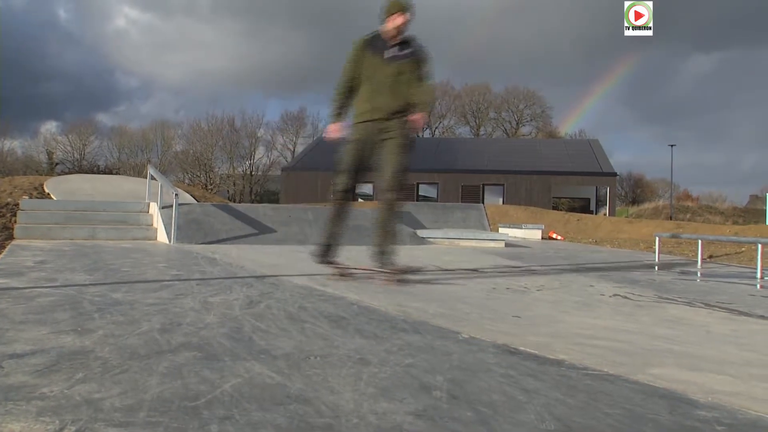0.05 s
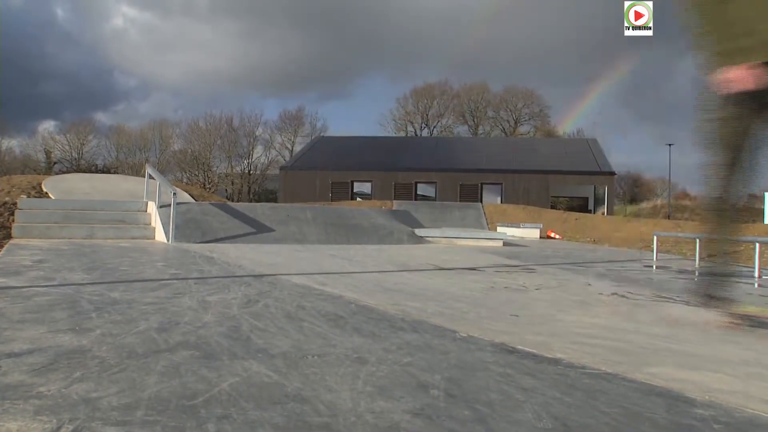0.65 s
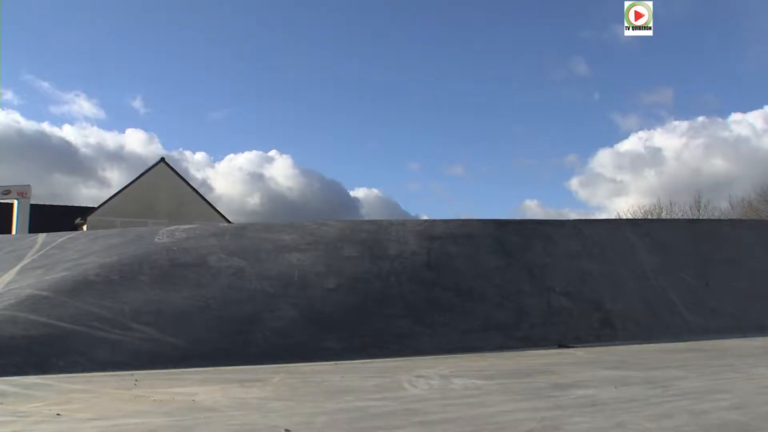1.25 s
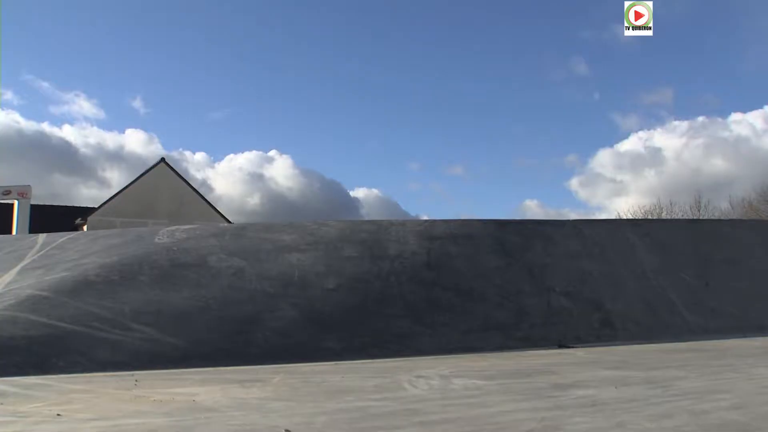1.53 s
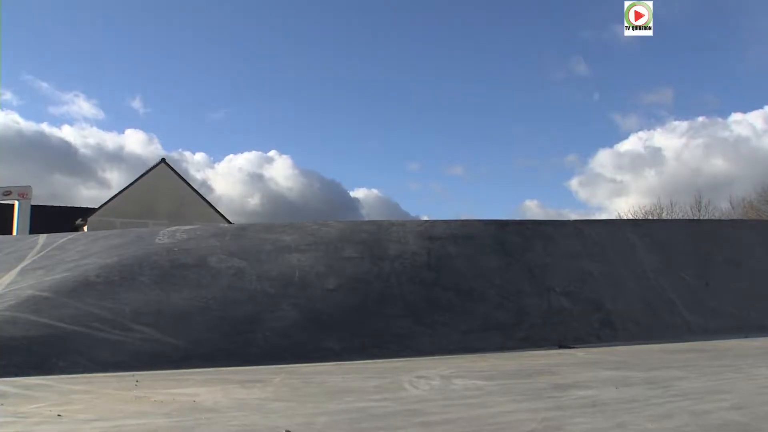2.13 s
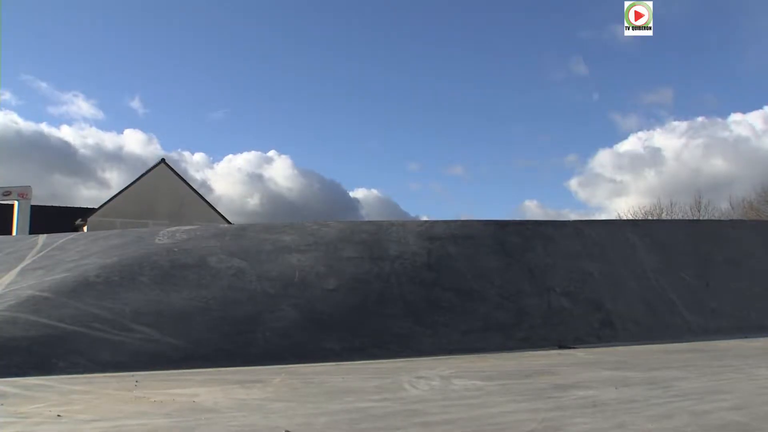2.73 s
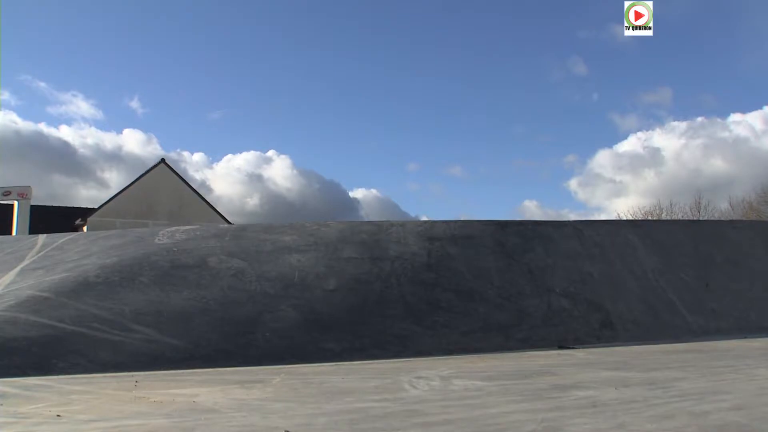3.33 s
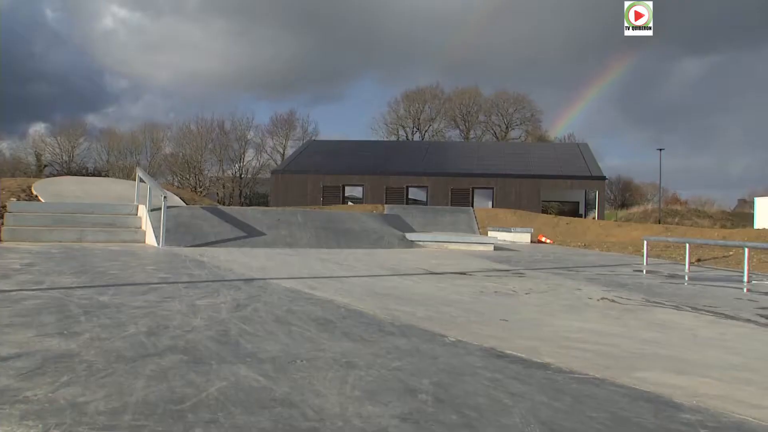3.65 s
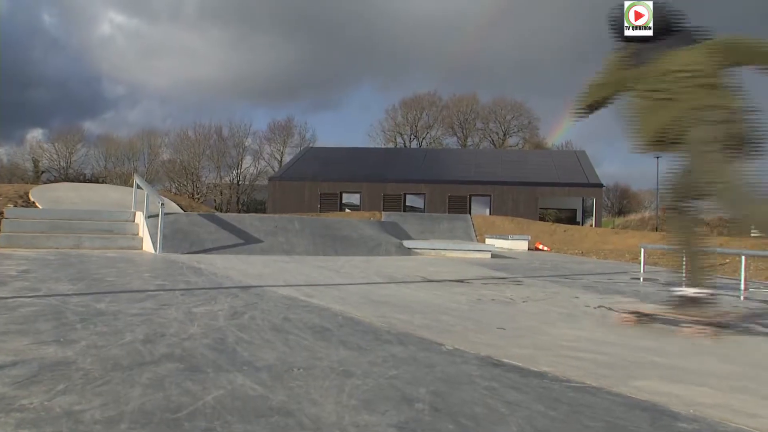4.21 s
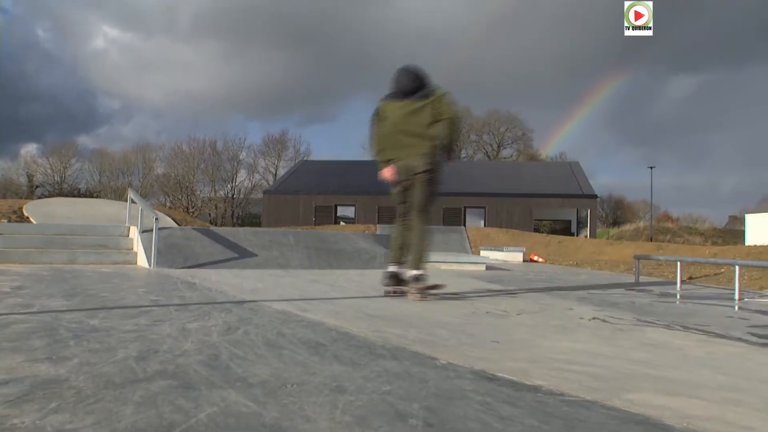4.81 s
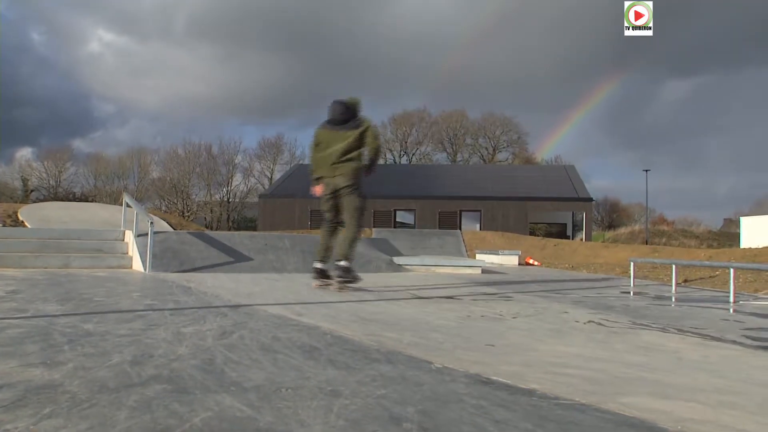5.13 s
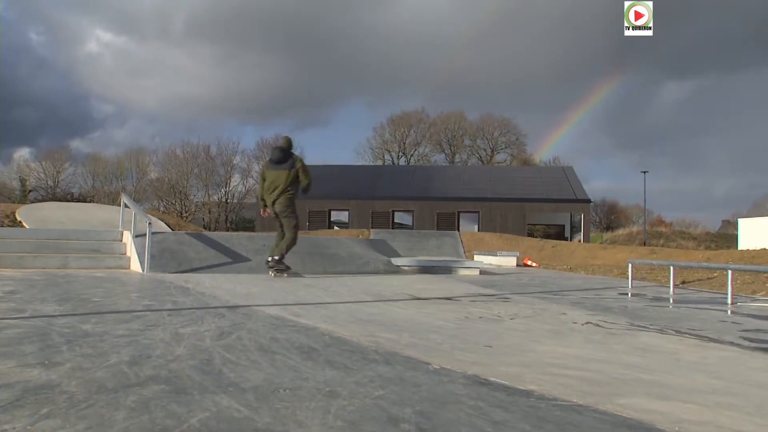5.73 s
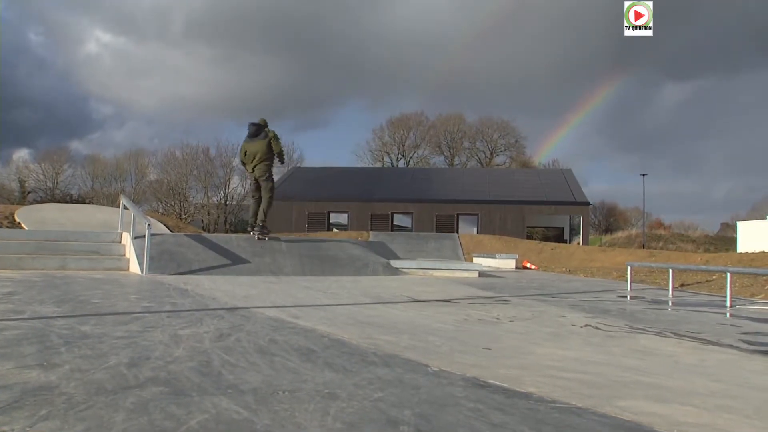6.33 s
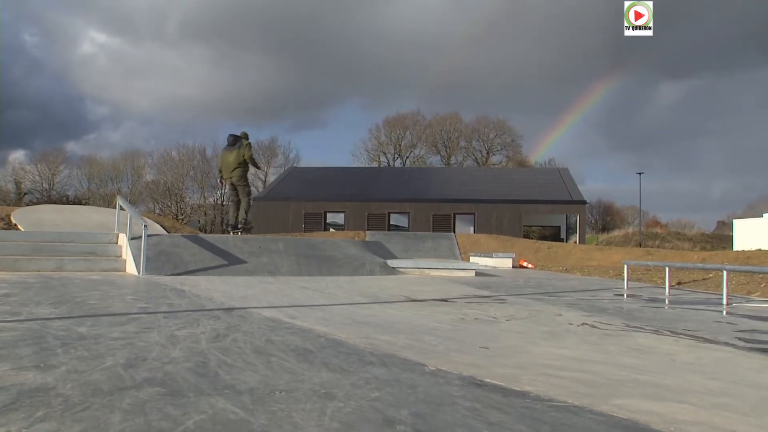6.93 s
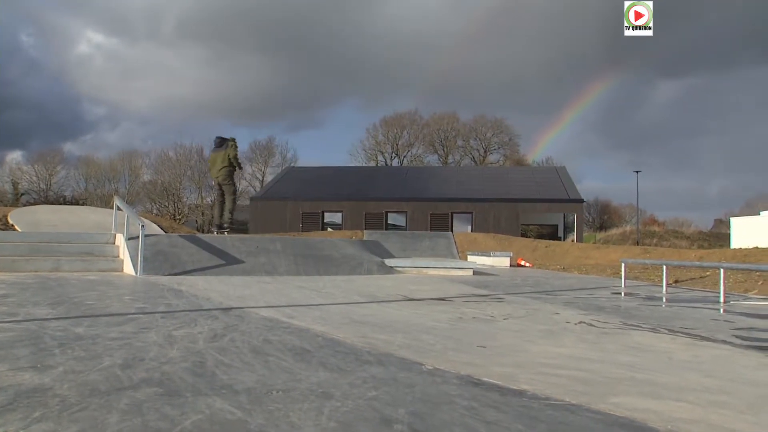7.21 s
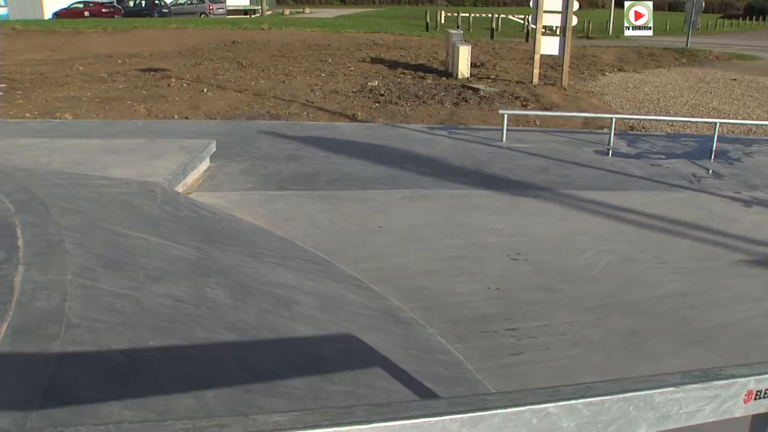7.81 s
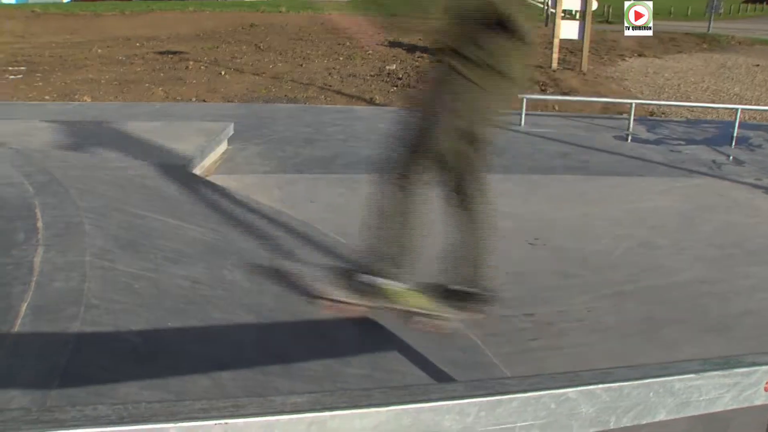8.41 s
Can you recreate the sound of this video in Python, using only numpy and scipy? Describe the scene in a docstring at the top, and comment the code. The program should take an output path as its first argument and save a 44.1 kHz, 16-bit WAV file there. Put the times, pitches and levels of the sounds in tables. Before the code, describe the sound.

A skateboard rolls over outdoor concrete, with a grainy deck rumble and humming, hissing wheels. It passes close at about 0.7 seconds, then recedes up a ramp, its tone sweeping as it climbs. At 2.1 seconds come two clacks with a brief axle scrape, and the rolling drops away until more clacks near 2.9 seconds. The board comes back, clacking over joints, and passes again at 4.1 seconds. It rolls off with a few light clicks, then strikes a sharp pair of clacks around 5.9 seconds. From 6.3 to 7.5 seconds it is quiet on a second ramp, with small knocks. The rolling returns at 7.8 seconds and swells quickly into the closest pass at 8.4 seconds, with the loudest wooden and metallic clacks. Light wind gusts rumble softly on the microphone over a faint open-air rush.

```python
"""A skateboard rolls through an outdoor park in light wind, passing close at 0.7 s. The grain of the
concrete makes the deck (the board) rumble and the wheels hum and hiss. As it climbs a ramp, sound
bouncing off the ground sweeps a notch through the tone, and the axles clack in pairs over joints.
At 2.1 s a truck (the metal axle holder) scrapes in the turn. The board comes back past at 4.1 s,
tops a second ramp at 6.8 s and passes closest at 8.4 s, with its loudest clacks."""
import sys
import numpy as np
from scipy import signal
from scipy.fft import rfft, irfft, next_fast_len
from scipy.io import wavfile
from scipy.ndimage import uniform_filter1d, map_coordinates

SR = 44100
rng = np.random.default_rng(int(sys.argv[2]) if len(sys.argv) > 2 else 0)


def master(y):
    """Save y as 16-bit WAV."""
    cut = np.clip(np.atleast_2d(y).T, -1, 1)
    pcm = np.round(cut * 32767)  # scale
    wavfile.write(sys.argv[1], SR, pcm.astype(np.int16))


N = 381906

# gusts of wind: peak_s, level_db, half_length_s
GUSTS = [(1.442, -60, 0.22), (2.141, -68.5, 0.23), (3.2, -64, 0.28), (4.41, -54.5, 0.4), (8.589, -54, 0.11)]
# tone of the wind and of the far surroundings: pitch_hz, level_db
WIND_TONE = [(15, -24), (35, -7), (70, -4.5), (130, -2), (300, -48), (1000, -0.5), (5000, -67)]
FAR_TONE = [(60, -1), (170, 4), (500, -6), (1500, -2), (2500, -38), (6000, -30.5), (15800, -33)]
# the board passes close: closest_s, gain_db, approach_s, retreat_s,
# rumble_db, rasp_db, hiss_db, treble_db, bass_tilt_db_per_octave
PASSES = [(.73, 10.5, 0.36, 0.3, 1, -5.5, 2, .5, 3.5), (4.08, 9, 0.12, 0.39, 1.8, -5, 2.5, 2, 1.5),
          (8.421, 16.5, 0.11, 0.11, 1.5, -2, -0.5, -2, 8.5)]
# it climbs a ramp and comes down: top_s, half_length_s, rumble_db, rasp_db, treble_db
RAMPS = [(2.453, 1.78, -9, 13, -11.5), (6.78, 0.95, 4.5, 3.5, -2)]
# how hard the wheels work the concrete, by speed and pressure: time_s, level_db
DRIVE = [(0, 4), (.3, -2), (.66, -0.5), (.85, -1), (1.25, -6), (1.55, -5), (2.08, 0), (2.17, -20),
         (2.24, -21.5), (2.78, -16), (2.9, 4), (3.3, -3), (3.7, 0.5), (4.9, 1), (5.3, 1), (5.75, -0.5),
         (5.96, 4), (6.26, -6.5), (6.42, -21), (6.73, -13.5), (7, -21.5), (7.42, -19), (7.85, 5),
         (8.66, -0.5)]
# coarse concrete swells the rumble: peak_s, gain_db, half_length_s
COARSE_PATCHES = [(0.578, 5, 0.032), (0.665, 5.5, 0.032)]
# wheel hum, changing with load and speed: time_s, pitch_hz, sharpness_q, upper_edge_hz, gain_db
WHEEL_HUM = [(0, 1550, 2.3, 2100, -1), (.5, 1610, 11, 2200, 4.5), (.85, 1640, 13, 2120, 6.5),
             (1.22, 1560, 2, 1920, 9), (1.4, 1440, 1.3, 1920, 4.5), (1.7, 1030, 2.3, 1700, 7),
             (2.1, 1420, .6, 1870, -2), (2.6, 1490, 8.8, 1800, 6), (3, 1200, .7, 1630, -1),
             (3.35, 1400, 0.43, 1850, 1), (3.65, 1530, 0.39, 2000, 7), (3.9, 1500, 7.8, 2230, 4),
             (4.3, 1580, 1.5, 2280, 1), (4.95, 1350, 1.7, 2010, 0.5), (5.3, 1640, 1.1, 1830, 3.5),
             (5.72, 1660, 1.2, 1800, 5.5), (6.1, 1423, 1.1, 1830, -0.5), (6.6, 1420, 1.1, 1990, 8),
             (6.76, 1300, 1.1, 1950, 10.5), (6.89, 1232, 1, 1750, 3), (7.2, 1320, 0.54, 1660, 3),
             (7.7, 1550, 1.5, 2150, -0.5), (8.3, 1490, 5.2, 2100, -1.5)]
# tone of the rolling layers, and the change in hiss on a slope: pitch_hz, level_db
RUMBLE_TONE = [(40, -56), (90, -19), (140, -13.5), (185, -5.5), (245, -5), (310, -1), (400, -2.5), (515, 2),
               (610, -1.5), (720, 2), (880, -3.5), (1050, -10), (1700, -7.5), (3000, -68)]
RASP_TONE = [(1200, -23), (1650, 0.5), (2000, 1), (2350, -0.5), (2650, -4), (2900, -8), (3300, -21),
             (5000, -26.5)]
HISS_TONE = [(2000, -23), (2800, 5.5), (3300, 4.5), (3900, 4), (4500, 2), (5100, 1), (5800, -1), (6800, 0),
             (8500, -4), (11000, -7.5), (13000, -14.5), (15800, -12.5)]
SLOPE_HISS_CHANGE = [(2000, -10), (3400, -3.5), (4600, 1.5), (7000, 3), (11000, 0.5), (15000, -9)]
# lag of the ground's reflection, growing with the board's height: time_s, lag_ms
GROUND_LAG = [(.95, 0.021), (1.24, 0.064), (1.58, 0.17), (1.85, 0.19), (2.05, 0.2), (2.45, 0.22),
              (2.9, 0.22), (3.28, 0.14), (3.68, 0.072), (3.95, 0.032), (6, 0.045), (6.15, 0.057),
              (6.35, 0.1), (6.7, 0.19), (7.35, 0.21), (7.7, 0.14)]
# bounces off ground and ramp: delay_ms, lag_multiple, strength (negative flips the wave), cutoff_hz
BOUNCES = [(0, 1, .46, 9500), (0, 1.55, .44, 5500), (.055, 1, -.17, 16000), (2.75, -3.5, .18, 9000)]
# wheels hit edges and joints: start_s, knock_db, knock_hz, truck_db, bite_db, length_s, flex_db, flex_hz
CLACKS = [(0.981, -41, 525, -43, -52, 0.0027, -37, 214), (1.011, -32, 480, -46, -57, .0023, -56, 200),
          (1.646, -39, 410, -48, -49, 0.0051, -62, 200), (1.73, -38, 342, -43, -52, 0.0043, -58, 200),
          (2.083, -44, 766, -37, -39, 0.0029, -70, 220),
          (2.087, -32.5, 750, -23.5, -34, 0.0039, -45.5, 222),
          (2.146, -31.5, 723, -44, -38, 0.0031, -70, 300), (2.149, -32.5, 740, -50, -36, 0.00437, -48, 310),
          (2.196, -50, 720, -60, -76, 0.0043, -70, 250), (2.317, -40.5, 740, -50, -73, 0.0057, -48.5, 280),
          (2.342, -62, 705, -56, -62, .003, -75, 250), (2.36, -51.5, 526, -48, -54.5, .002, -72, 250),
          (2.383, -51, 710, -52, -62, 0.0028, -70, 250), (2.422, -63, 690, -64, -60, .007, -75, 250),
          (2.82, -40, 342, -36, -39, 0.0042, -50, 199), (2.825, -35, 940, -34, -37, 0.0055, -50, 334),
          (2.834, -40, 362, -28.5, -38.5, 0.0064, -60, 200),
          (2.886, -40.5, 667, -37.5, -40, 0.0065, -64, 200),
          (2.892, -58, 380, -39, -41.5, 0.0067, -63, 200),
          (3.838, -32.5, 525, -31.5, -45.5, 0.0024, -41, 182),
          (3.964, -30, 520, -31.5, -43, 0.0058, -41, 170), (3.992, -33, 673, -28, -41, 0.0025, -45, 170),
          (4.701, -47, 553, -39.5, -50, 0.017, -46, 185.3),
          (5.019, -32.5, 610, -39, -54, 0.00086, -50, 200), (5.03, -37, 420, -49, -55, 0.0012, -57, 200),
          (5.192, -39, 670, -38, -50, 0.0084, -46, 203.4), (5.878, -24, 400, -28, -47, 0.0044, -33, 311),
          (5.885, -25, 513, -23.5, -43.5, 0.0027, -30, 320), (5.953, -19, 568, -28.5, -41, .003, -32, 195),
          (5.958, -21, 559, -28, -37, 0.0043, -33.5, 232), (6.222, -42, 270, -77, -71, 0.0043, -47, 212),
          (6.285, -48, 730, -42, -53, .0056, -52, 200), (6.34, -45, 510, -42.5, -54, .0057, -49, 181),
          (6.368, -58, 358, -46.5, -62, .0041, -49, 170), (6.547, -70, 594, -49, -61.5, 0.0022, -75, 200),
          (6.625, -37, 344, -51, -68, 0.0029, -42, 180), (6.637, -46, 261, -51, -65, 0.0054, -52, 171),
          (6.841, -38, 495, -33, -48.5, .005, -44, 223), (6.853, -56, 513, -41, -61, 0.0038, -55, 220),
          (7.003, -45.5, 400, -59, -75, 0.0038, -46, 240), (7.018, -41, 248, -66, -76, 0.0045, -49, 240),
          (7.687, -38, 744, -37.5, -46, 0.0057, -59, 200), (7.781, -28.5, 486, -37, -50, .0083, -66, 200),
          (8.417, -31, 462, -23, -45, 0.0016, -41, 140), (8.419, -10.5, 564, -13, -36, 0.00067, -19, 140),
          (8.482, -16, 456, -12, -28, 0.0059, -23.5, 203), (8.495, -21, 470, -38, -35.5, 0.0052, -26, 256),
          (8.644, -32, 307, -44, -41.5, 0.0026, -46, 200)]
# the deck's knock: pitch_multiple, level_db, fade_multiple
KNOCK_MODES = [(1, 1, 1.1), (1.157, -7, .4), (1.45, -7, .35), (1.9, -8, .4)]
# the plywood's many short-lived vibrations: pitch_multiple, level_db
PLYWOOD_TONE = [(.2, -45), (.45, 3), (.8, 10), (1.3, -2), (1.8, -1.5), (2.5, 7), (3.4, -47), (9, -49)]
# the deck bends: pitch_multiple, level_db, fade_s (a fade is the time to drop 60 dB)
FLEX_MODES = [(1, 0.5, 0.025), (1.3, -4, 0.015)]
# ringing of truck and axle: pitch_hz, level_db, fade_s
TRUCK_MODES = [(1110, -1.5, .015), (1346, 4, 0.0093), (1552, 6.2, 0.014), (1700, 1, 0.012)]
AXLE_MODES = [(2013, 8.5, .019), (2350, 5.5, 0.022), (2640, 7, 0.013), (3310, 2.5, 0.01), (3940, 1, 0.007)]
# tone of rattling truck parts and of cracking grit: pitch_hz, level_db
RATTLE_TONE = [(500, -42), (800, -5), (1100, 0), (1500, 5), (1800, -18), (2200, -22), (3200, -17),
               (5000, -29.5)]
CRACK_TONE = [(200, -12), (800, 14), (2500, -23), (3800, 2.5), (5500, 4), (7500, 3), (10000, -3),
              (12500, -13.5), (14600, -22), (15800, -12)]
# echo from ramps and walls: pitch_hz, fade_s
ECHO_FADES = [(150, 0.37), (1500, 0.21), (10000, 0.13)]
# a truck drags over the ramp's edge: peak_s, level_db
DRAGS = [(2.11, -48), (2.137, -39)]
# tone of that scrape: pitch_hz, level_db
SCRAPE_TONE = [(100, -30), (200, -10), (560, -18), (730, 23), (900, -23), (1150, -1), (1500, 10),
               (1750, -1), (2100, -5), (3500, -27), (7000, -36), (15000, -53)]


def amp(db):
    """Turn decibels into a gain."""
    return 10 ** (np.asarray(db) / 20)


def unit(x):
    """Scale to an average (rms) level of 1."""
    return x / np.sqrt(np.mean(x ** 2) + 1e-20)


def crest(x):
    """Scale so that the loudest 4 ms have a level of 1."""
    return x / np.sqrt(np.max(uniform_filter1d(x ** 2, 176)) + 1e-20)


def along(points, hz):
    """Read a table by pitch, on a log scale."""
    pitches, values = np.transpose(points)
    return np.interp(np.log(hz + 1), np.log(pitches + 1), values)


def curves(rows, t):
    """Read each column of a table at times t."""
    times, *columns = np.transpose(rows)
    return [np.interp(t, times, column) for column in columns]


def wobble(rate):
    """A smooth curve through `rate` random points a second."""
    return map_coordinates(rng.standard_normal(int(N * rate / SR) + 4), [np.arange(N) * rate / SR])


def coloured(x, tone):
    """Give x a steady tone colour, at level 1."""
    size = next_fast_len(len(x) + 2048)
    gain = amp(along(tone, np.fft.rfftfreq(size, 1 / SR)))
    return unit(irfft(rfft(x, size) * gain, size)[:len(x)])


def swept(x, shape):
    """Give x a changing tone colour, shape(hz, t), at level 1."""
    hz, t, spectrum = signal.stft(x, SR, nperseg=1024)
    gain = shape(hz[:, None] + 1, t)
    return unit(signal.istft(spectrum * gain / np.linalg.norm(gain, axis=0), SR, nperseg=1024)[1][:N])


def wind(t):
    """Light wind rumbles on the microphone, with a few gusts."""
    gusts = sum(amp(db) * np.exp(-((t - s) / half) ** 2) for s, db, half in GUSTS)
    return (amp(-85) + gusts) * amp(wobble(22)) * coloured(rng.standard_normal(N), WIND_TONE)


def surroundings(level_db=-67):
    """The faint steady rush of the open air."""
    return amp(level_db) * coloured(rng.standard_normal(N), FAR_TONE)


def closeness(t):
    """One row per pass: 1 when closest, falling with distance squared."""
    return np.array([1 / (1 + ((t - s) / np.where(t < s, approach, retreat)) ** 2)
                     for s, _, approach, retreat, *_ in PASSES])


def nearness_db(t):
    """Gain from all passes, compared with far away."""
    return 10 * np.log10(1 + amp(np.array(PASSES)[:, 1]) ** 2 @ closeness(t))


def pass_colour(t):
    """The board faces differently on each pass: extra rumble, rasp, hiss, treble and bass tilt."""
    return np.array(PASSES)[:, 4:].T @ closeness(t)


def on_ramps(t, entry_speed=1.74):
    """Each climb is an arc: how far onto the slope (0 to 1), then extra dB of rumble, rasp and treble."""
    top_s, half_s, rumble_db, rasp_db, treble_db = np.transpose(RAMPS)[:, :, None]
    arc = np.clip(1 - ((t - top_s) / half_s) ** 2, 0, 1)
    slope, on_top = np.tanh(entry_speed * arc), arc ** 4
    return np.sum([slope, rumble_db * on_top, rasp_db * on_top, treble_db * slope], axis=1)


def concrete(grains_per_s, grain_db):
    """The ground under the wheels: fine texture plus single coarser grains."""
    grains = (rng.random(N) < grains_per_s / SR) * rng.standard_normal(N)
    return unit(rng.standard_normal(N) + amp(grain_db) * unit(grains))


def deck_shape(hz, t):
    """The deck rings over a broad range, with more bass when far away."""
    tilt_db = 4 - 0.6533 * nearness_db(t) + pass_colour(t)[4]
    return amp(along(RUMBLE_TONE, hz) - tilt_db * np.log2(np.clip(hz, 150, 1500) / 500))


def wheel_shape(hz, t):
    """The wheels sing at one moving pitch; bumps smaller than their footprint are smoothed away."""
    pitch_hz, sharpness, edge_hz, _ = curves(WHEEL_HUM, t)
    band = 1 / np.sqrt(1 + (sharpness * (hz / pitch_hz - pitch_hz / hz)) ** 2)
    return band / np.sqrt((1 + (hz / edge_hz) ** 32) * (1 + (750 / hz) ** 10))


def hiss_shape(hz, t):
    """Crushed grit hisses: brighter close by, duller and patchier on the ramps."""
    slope, _, _, ramp_treble_db = on_ramps(t)
    treble = 6 + 0.5 * nearness_db(t) + pass_colour(t)[3] + ramp_treble_db
    treble_db = treble * along([(7500, 0.48), (12000, 0.65)], hz)
    patches = uniform_filter1d(rng.standard_normal((len(hz), len(t))), size=8, axis=0)
    patches_db = (1.4 + 0.7 * slope) * unit(uniform_filter1d(patches, size=24, axis=1))
    return amp(along(HISS_TONE, hz) + slope * along(SLOPE_HISS_CHANGE, hz) + patches_db + treble_db)


def rolling(t):
    """Wheels run over concrete; nearness and drive set four layers, and uneven patches shake them all."""
    near_db, patches = nearness_db(t), wobble(45)
    drive_db, = curves(DRIVE, t)
    _, ramp_rumble_db, ramp_rasp_db, _ = on_ramps(t)
    rumble_db, rasp_db, hiss_db, *_ = pass_colour(t)
    hum_db = curves(WHEEL_HUM, t)[-1]
    rumble_db += sum(db * np.exp(-((t - s) / half) ** 2) for s, db, half in COARSE_PATCHES)
    rumble_db += -54.5 + 0.89 * near_db + 0.75 * drive_db + ramp_rumble_db + 0.53 * patches
    hum_db += -56 + 0.43 * near_db + 0.75 * drive_db + 0.5 * patches
    rasp_db += -66.5 + 1.48 * near_db + 0.72 * drive_db + ramp_rasp_db + 0.88 * patches
    hiss_db += -64.5 + 0.95 * near_db + 0.63 * drive_db + 0.91 * patches
    rumble = amp(rumble_db + 1.16 * wobble(60)) * swept(concrete(200, grain_db=-10), deck_shape)
    hum = amp(hum_db + 1.2 * wobble(90)) * swept(concrete(330, grain_db=-20), wheel_shape)
    rasp = amp(rasp_db) * coloured(concrete(220, grain_db=-12), RASP_TONE)
    hiss = amp(hiss_db) * swept(concrete(400, grain_db=-8), hiss_shape)
    return rumble + hum + rasp + hiss


def ramp_reflections(x, t):
    """On a ramp, late, duller copies cancel some pitches; these notches move with the board's height."""
    slope = on_ramps(t)[0]
    ground_ms, = curves(GROUND_LAG, t)
    size = next_fast_len(N + 2048)
    hz = np.fft.rfftfreq(size, 1 / SR)
    for delay_ms, multiple, strength, cutoff_hz in BOUNCES:
        dull = irfft(rfft(x, size) / (1 + (hz / cutoff_hz) ** 4), size)[:N]
        late = map_coordinates(dull, [np.arange(N) - SR * (delay_ms + multiple * ground_ms) / 1000])
        x = (x + strength * slope * late) / np.sqrt(1 + (strength * slope) ** 2)
    return x


def clatter(t, length_s, rebounds=3):
    """Loose parts shake after a first hit, with rebounds as the other wheel lands."""
    blows = 0.014 * rng.standard_normal(len(t)) * amp(-60 * t / 0.025)
    blows[0] += 0.75
    rebound_s = rng.uniform(0.196, 1, rebounds) * np.clip(length_s, 0.001, 0.03)
    blows[(rebound_s * SR).astype(int)] += 0.49 * rng.choice([-1, 1], rebounds)
    return blows


def ring(modes, t, scatter_db=2, detune=0.028, rise_cycles=0.67):
    """A struck part rings in fading tones (modes), a little different each time."""
    hz, db, fade_s = np.transpose(modes)[:, :, None]
    size, shift, phase = rng.standard_normal((3, len(modes), 1))
    rise = 1 - np.exp(-(t * hz / rise_cycles) ** 2)
    swing = np.sin(2 * np.pi * (hz * (1 + detune * shift) * t + phase))
    return np.sum(amp(db + scatter_db * size - 60 * t / fade_s) * rise * swing, axis=0)


def burst(t, length_s, fade_s, tone, rise_s=0.00028):
    """Noise that swells while the wheel presses on the edge, then dies."""
    swell = (1 - np.exp(-(t / rise_s) ** 2)) * amp(-60 * np.maximum(t - length_s / 2, 0) / fade_s)
    return crest(swell * coloured(rng.standard_normal(len(t)), tone))


def clacks(loaded_fade_s=0.018, light_fade_s=0.046, hard_bite_db=-27.5):
    """Each strike knocks and bends the deck, rings truck and axle, and cracks grit."""
    out, t = np.zeros(N + SR), np.arange(SR // 5) / SR
    for start_s, knock_db, knock_hz, truck_db, bite_db, length_s, flex_db, flex_hz in CLACKS:
        blows = clatter(t, length_s)
        struck = lambda modes: crest(signal.fftconvolve(blows, ring(modes, t))[:len(t)])
        plywood = burst(t, length_s, 0.022, np.array(PLYWOOD_TONE) * [knock_hz, 1])
        # on a ramp the deck carries less weight and rings longer
        fade_s = loaded_fade_s + (light_fade_s - loaded_fade_s) * on_ramps(start_s)[0, 0]
        knock = amp(-5) * struck(np.array(KNOCK_MODES) * [knock_hz, 1, fade_s]) + amp(-10.5) * plywood
        flex = crest(ring(np.array(FLEX_MODES) * [flex_hz, 1, 1], t, rise_cycles=0.31))
        wood = amp(knock_db) * knock + amp(flex_db - 1.5) * flex
        axle_db = hard_bite_db + 1 + 1.47 * (bite_db - hard_bite_db)  # soft blows ring it less
        truck = amp(-11.5) * struck(TRUCK_MODES) + amp(-7.5) * burst(t, length_s, 0.023, RATTLE_TONE)
        metal = amp(truck_db) * truck + amp(axle_db) * struck(AXLE_MODES)
        crack = amp(bite_db - 4) * burst(t, length_s, 0.029, CRACK_TONE)
        out[round(start_s * SR):][:len(t)] += wood + metal + crack
    # the hits carry almost no deep bass
    return signal.sosfiltfilt(signal.butter(2, 105, "highpass", fs=SR, output="sos"), out[:N])


def park_echo(x):
    """Sound scatters off ramps and walls, the treble dying first."""
    hz, t, noise = signal.stft(rng.standard_normal(SR // 2), SR, nperseg=256)
    tail = signal.istft(noise * amp(-60 * t / along(ECHO_FADES, hz)[:, None]), SR, nperseg=256)[1]
    return signal.fftconvolve(x, tail / np.linalg.norm(tail))[:N]


def truck_scrape(t, rise_db_per_s=600, fall_db_per_s=748):
    """Between the two clacks of the turn, a dragging truck keeps the deck ringing."""
    drag = sum(amp(db - np.maximum(rise_db_per_s * (s - t), fall_db_per_s * (t - s))) for s, db in DRAGS)
    return drag * coloured(concrete(870, grain_db=-19), SCRAPE_TONE)


def scene():
    """Mix the rolling board, its hits and their echo with the open air."""
    t = np.arange(N) / SR
    hits = clacks() + truck_scrape(t)
    board = ramp_reflections(rolling(t), t)
    return (board + hits + amp(-12) * park_echo(hits) + wind(t) + surroundings())[None]


def record(dry):
    """Cut off the very highest treble."""
    size, top_hz = next_fast_len(N + 4096), 15850
    return irfft(rfft(dry, size) * (np.fft.rfftfreq(size, 1 / SR) < top_hz), size)[:, :N]


dry = scene()
out = record(dry)
master(out)
```